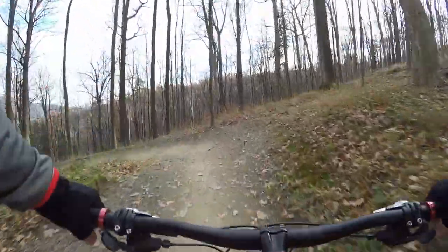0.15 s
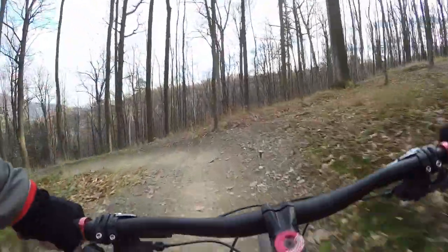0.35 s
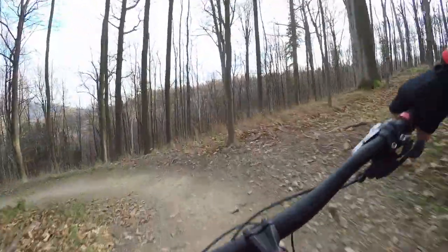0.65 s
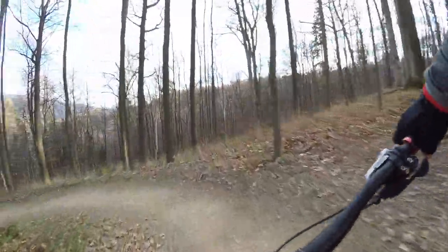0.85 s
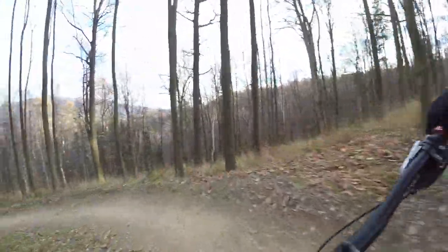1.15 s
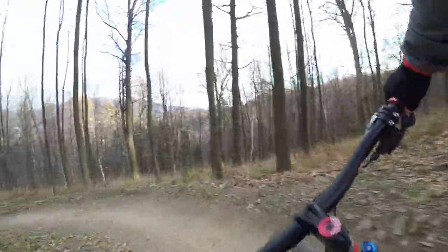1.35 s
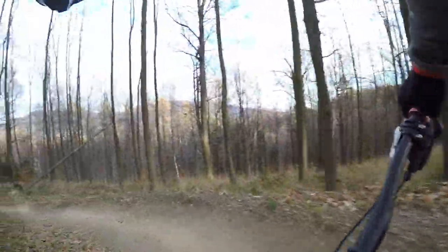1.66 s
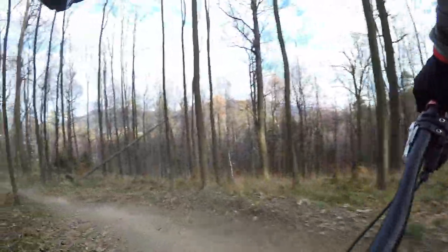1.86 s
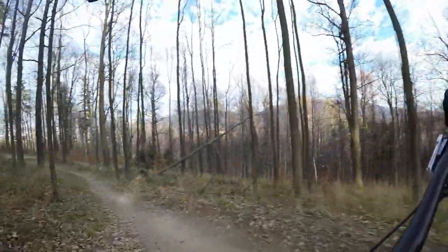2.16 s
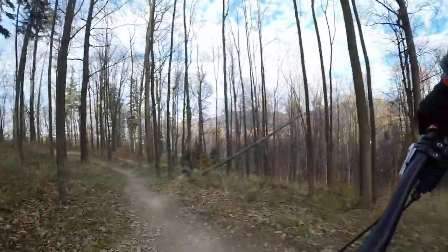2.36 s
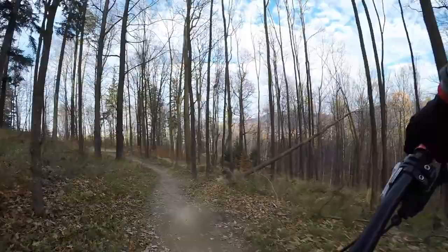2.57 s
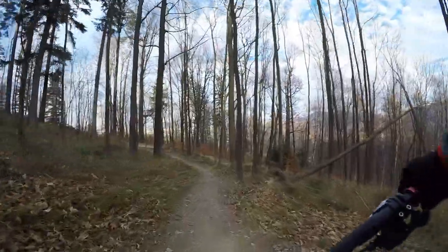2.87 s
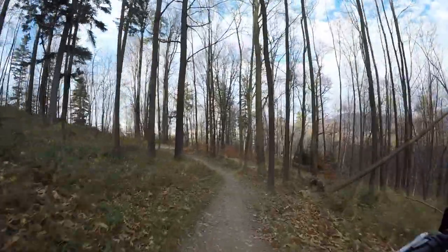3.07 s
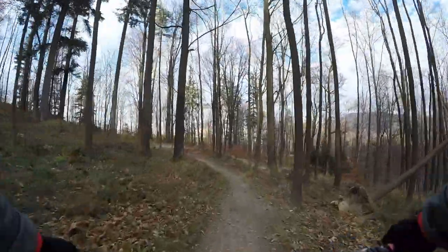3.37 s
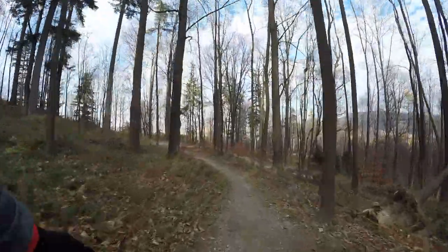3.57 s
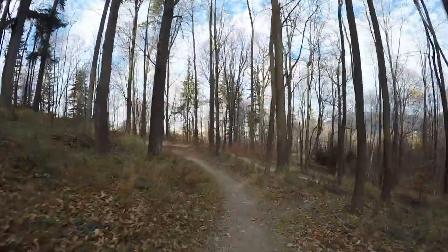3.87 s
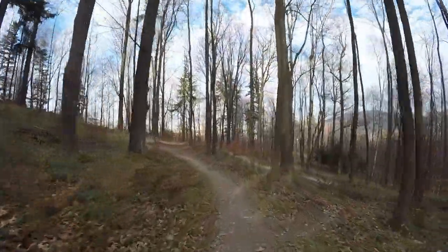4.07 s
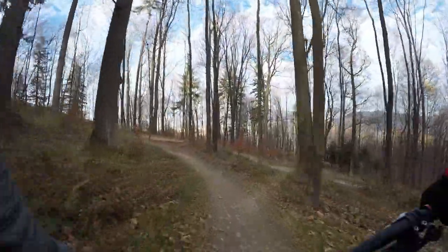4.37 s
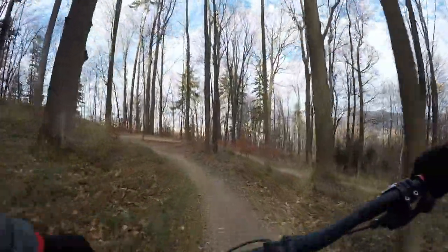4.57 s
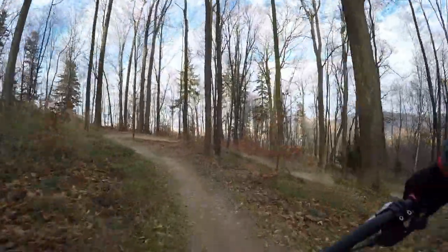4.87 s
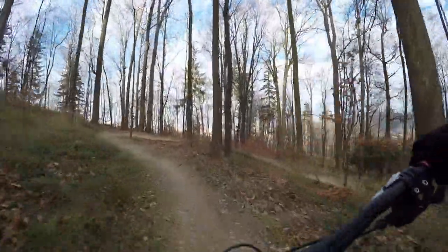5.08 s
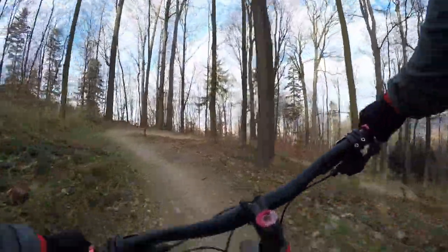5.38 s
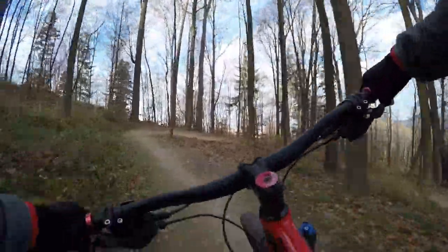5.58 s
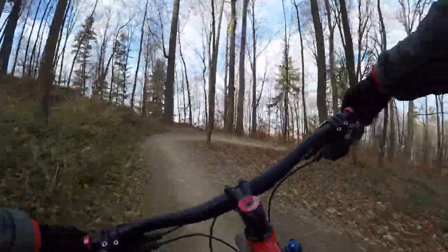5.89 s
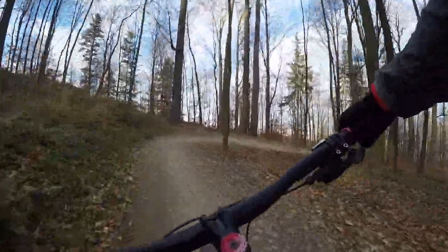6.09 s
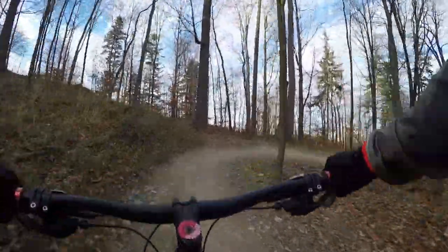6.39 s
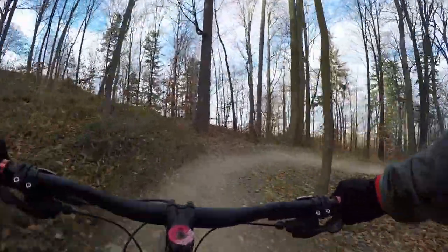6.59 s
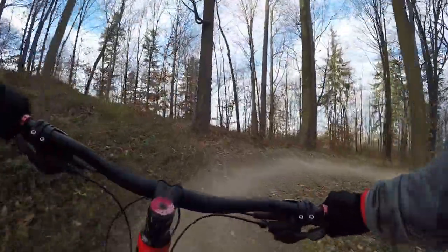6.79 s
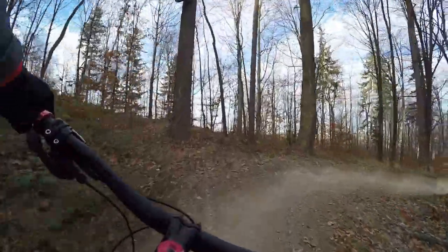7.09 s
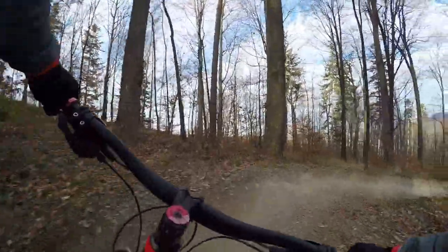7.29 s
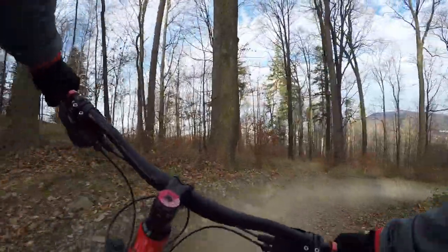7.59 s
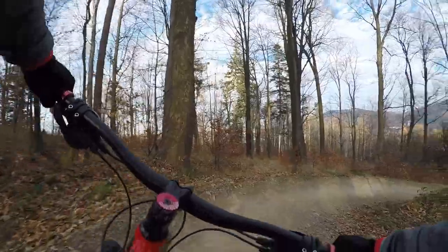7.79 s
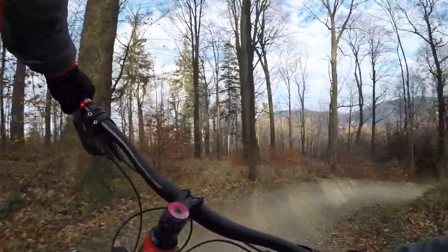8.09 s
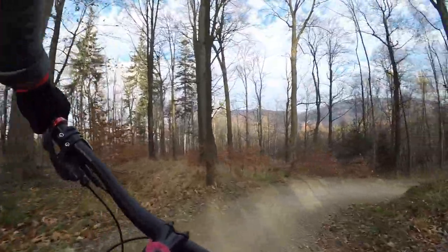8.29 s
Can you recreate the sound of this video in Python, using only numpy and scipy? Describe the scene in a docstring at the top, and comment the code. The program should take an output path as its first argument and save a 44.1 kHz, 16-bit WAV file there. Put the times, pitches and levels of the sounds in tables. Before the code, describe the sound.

Gusty wind rumbles on the microphone over a mountain bike's ticking chain, gravelly tyre noise and scattered knocks.

```python
"""Wind rumbles and buffets a microphone on a rider's chest as a mountain bike runs fast down a dirt trail.
Just below, the tyres crunch and hiss over dirt and gravel, their tread hums, and a brake disc sings faintly.
The chain ticks against metal that rings briefly, and bumps knock through the frame.
Everything is close and dry, in mono; the loudest peaks flatten at the microphone's input."""
import sys
import numpy as np
from scipy import signal
from scipy.io import wavfile
from scipy.ndimage import uniform_filter1d

SR = 44100
rng = np.random.default_rng(int(sys.argv[2]) if len(sys.argv) > 2 else 0)


def bounce(signal):
    """Save signal as a 16-bit WAV file at the path given by the first command-line argument."""
    frames = np.transpose(np.atleast_2d(signal))
    limited = np.clip(frames, -1, 1)
    pcm = np.round(limited * 32767).astype(np.int16)
    wavfile.write(sys.argv[1], SR, pcm)


N = 372644

# patches of loose gravel under the wheels: t/s, length/s, crunch level/dB
GRAVEL_PATCHES = [(1.411, 0.12, -33.5), (1.718, 0.177, -41), (2.52, 0.078, -34.5), (3.021, 0.034, -27),
                  (4.662, 0.018, -25), (4.881, 0.062, -28), (5.013, .17, -25), (5.195, 0.058, -32.5),
                  (6.151, 0.042, -30.5)]
GRAVEL_RISE_S, GRAVEL_FALL_S, GRAVEL_HISS_DB = .0074, .015, -7.5  # hiss is relative to the crunch
# modes of the chain and its gears: f/Hz, relative level/dB, t60/s
METAL_MODES = [(3600, -4, .025), (4010, -4, .05), (4570, -3, .035), (5285, -2, .04), (6235, -4, .035),
               (7300, -8, .02), (9610, -7, .04), (10400, -5, .022), (13000, -12, .02)]


def amp(db):
    return 10 ** (np.asarray(db) / 20)


def unit_rms(x):
    return x / np.sqrt(np.mean(x ** 2) + 1e-20)


def spectrum_db(points, hz):
    f, db = np.transpose(points)
    return np.interp(np.log(hz + 1), np.log(f + 1), db)


def level_curve(table, column=1):
    """Amplitude at every sample, from rows of time and dB."""
    rows = np.array(table)
    return amp(np.interp(np.arange(N) / SR, rows[:, 0], rows[:, column]))


def envelope(start, length, rise, fall):
    """A straight rise, a hold and an exponential release."""
    t = np.arange(N) / SR - start
    return np.clip(t / rise, 0, 1) * np.exp(-np.maximum(t - length, 0) / fall)


def add(mix, start, sound):
    part = mix[round(start * SR):][:len(sound)]
    part += sound[:len(part)]


def bandpass(x, low_hz, high_hz):
    return signal.sosfilt(signal.butter(3, [low_hz, high_hz], "bandpass", fs=SR, output="sos"), x)


def resonant_noise(hz, width_hz):
    """Noise ringing in one resonance, rms 1."""
    r = np.exp(-np.pi * width_hz / SR)
    feedback = [1, -2 * r * np.cos(2 * np.pi * hz / SR), r * r]
    return unit_rms(signal.lfilter([1], feedback, rng.standard_normal(N)))


def rough_noise(colour, size, patchy_db, flicker_db, stretch=lambda t: 1):
    """Patchy, flickering noise, rms 1; stretch(t) scales the frequencies of its colour."""
    hop = size // 4
    frames, bins = N // hop + 5, size // 2 + 1
    hz, t = np.fft.rfftfreq(size, 1 / SR), np.arange(frames) * hop / SR
    real, imag, patches = rng.standard_normal((frames, bins, 3)).T
    patches = unit_rms(uniform_filter1d(uniform_filter1d(patches, size=6, axis=0), size=8, axis=1))
    flicker = unit_rms(uniform_filter1d(rng.standard_normal(frames), size=3))
    gain = amp(spectrum_db(colour, hz[:, None] / stretch(t)) + patchy_db * patches + flicker_db * flicker)
    gain /= np.sqrt(uniform_filter1d((gain ** 2).mean(0), size=40))  # even out slow swells
    return unit_rms(signal.istft((real + 1j * imag) * gain, nperseg=size, noverlap=size - hop)[1][:N])


def wind():
    """Air on the microphone: a deep rumble, and buffeting that slides up in pitch as the eddies get finer."""
    # steady airflow: t/s, rumble level/dB
    airflow = [(0, -13.5), (.6, -19.5), (1.75, -13), (1.95, -17.5), (2.7, -14), (3.5, -16), (4.9, -13.5),
               (5.6, -16.5), (5.75, -20), (6.3, -17), (7.3, -20), (7.7, -21), (8.45, -18.5)]
    # gusts on the microphone: t/s, length/s, buffet level/dB, share of fine eddies/dB
    gusts = [(0, 0.07, -28, -28), (0.104, 0.22, -21.5, -20), (0.266, 0.039, -27.5, -18),
             (0.736, 0.053, -23, -13), (0.899, 0.057, -15, -21.5), (1.015, 0.032, -10.5, -27),
             (1.273, 0.025, -25, -19), (1.435, 0.16, -22.5, -6.5), (1.734, 0.061, -29, -15),
             (2.049, 0.081, -23.5, -10.5), (2.267, 0.087, -23.5, -14), (2.808, 0.15, -13.5, -8),
             (2.972, 0.022, -9, -6), (3.024, 0.047, -14, -2.5), (3.106, 0.16, -19.5, -4),
             (3.234, 0.059, -12.5, -2), (3.268, 0.064, -9, -1), (3.345, 0.32, -12.5, -3),
             (3.686, 0.091, -17.5, 0.5), (3.713, 0.15, -18, -1.5), (4.091, 0.13, -24.5, -1.5),
             (4.222, 0.088, -22.5, -1), (4.44, 0.062, -19.5, -4.5), (4.73, .09, -18.5, -8),
             (5.004, 0.059, -21, -9), (5.436, 0.16, -34, 9), (6.165, 0.13, -31, -3),
             (6.358, 0.015, -14.5, -2.5), (6.58, 0.04, -24.5, -5), (6.684, 0.086, -18, -14.5),
             (6.881, 0.054, -16, -10.5), (7.16, 0.051, -14.5, -15), (7.186, .1, -8.5, -11),
             (7.329, 0.084, -14.5, -13.5), (7.446, 0.016, -17, -10), (7.602, 0.034, -16, -15.5),
             (7.882, 0.039, -18, -15), (8.061, 0.049, -6.5, -15), (8.189, 0.019, -12, -10),
             (8.216, 0.018, -9, -6.5), (8.24, 0.073, -17, -17), (8.339, 0.028, -10, -8.5),
             (8.375, 0.041, -10.5, -9.5)]
    # colour of the rumble: f/Hz, relative level/dB
    rumble_colour = [(7.1, -26), (12, 2), (40, 2.5), (88, -7.5), (242, -30), (277, -28.5), (300, -62),
                     (390, -69), (660, -120)]
    # colour of fine eddies, before it slides: f/Hz, relative level/dB
    eddy_colour = [(60, -11), (170, -0.5), (400, -4.5), (800, -10.5), (1500, -26), (3500, -51),
                   (7000, -72.5)]
    calm_db, calm_fine_db = -14.5, -6.5  # buffeting between gusts: level re rumble, share of fine eddies
    steady_power = level_curve(airflow) ** 2
    gust_powers = np.array([(amp(db) * envelope(start, length, rise=.01, fall=.027)) ** 2
                            for start, length, db, _ in gusts])
    calm_power = steady_power * amp(calm_db) ** 2
    buffet_power = calm_power + gust_powers.sum(0)
    rumble_power = steady_power + amp(-7.5) ** 2 * gust_powers.sum(0)  # gusts also swell the rumble
    fine_db = (calm_fine_db * calm_power + np.array(gusts)[:, 3] @ gust_powers) / buffet_power
    rumble = rough_noise(rumble_colour, size=2048, patchy_db=0, flicker_db=2)
    buffet = rough_noise(eddy_colour, size=512, patchy_db=2.5, flicker_db=2.5,
                         stretch=lambda t: amp(.65 * np.interp(t, np.arange(N) / SR, fine_db)))
    return np.sqrt(rumble_power) * rumble + np.sqrt(buffet_power) * buffet


def ground_levels():
    """Amplitudes of the tyres' crunch and hiss: the dirt, with the gravel patches on top."""
    # dirt under the tyres: t/s, crunch level/dB, grit and leaf hiss level/dB
    dirt = [(0, -32.5, -43), (.22, -40, -44.5), (1.1, -40.5, -43), (1.6, -35, -39), (2.2, -36, -42.5),
            (2.5, -32, -39.5), (2.85, -44, -37.5), (3.15, -30, -36.5), (3.32, -61, -50.5),
            (3.6, -41, -55.5), (4.18, -40.5, -48.5), (4.45, -28.5, -40), (5, -35.5, -38.5),
            (5.6, -30, -35.5), (6.05, -35, -39.5), (7.05, -33.5, -40), (7.5, -36.5, -44),
            (8.45, -40, -46.5)]
    gravel_power = sum((amp(db) * envelope(start, length, GRAVEL_RISE_S, GRAVEL_FALL_S)) ** 2
                       for start, length, db in GRAVEL_PATCHES)
    crunch_level = np.sqrt(level_curve(dirt, column=1) ** 2 + gravel_power)
    hiss_level = np.sqrt(level_curve(dirt, column=2) ** 2 + amp(GRAVEL_HISS_DB) ** 2 * gravel_power)
    return crunch_level, hiss_level


def grit():
    """Single bits of grit crack under the tyres, each a few cycles with a soft start; rms 1."""
    cracks_per_s, pitches_hz = 500, np.geomspace(900, 4500, 8)
    cracks = amp(3.2 * np.minimum(rng.exponential(1, N), 4)) * (rng.random(N) < cracks_per_s / SR)
    kind = rng.integers(0, 8, N)
    cycles = np.arange(300) / SR * pitches_hz[:, None]
    grains = np.sin(2 * np.pi * cycles) * cycles * np.exp(-cycles / .84)
    return unit_rms(sum(signal.oaconvolve(cracks * (kind == k), grain)[:N]
                        for k, grain in enumerate(grains)))


def tyres():
    """Down on the trail, loose dirt crunches and hisses while the tread knobs hum in a narrow band."""
    # colour of crunching dirt: f/Hz, relative level/dB
    crunch_colour = [(300, 10.5), (700, -0.5), (1500, -1.5), (2500, -7), (4000, -18.5), (7000, -68.5)]
    # colour of grit and leaf hiss: f/Hz, relative level/dB
    hiss_colour = [(1500, 9.5), (3500, 0.5), (6500, -2.5), (8500, -4), (11000, -8.5), (15500, -9)]
    # hum of the tread: t/s, level/dB
    tread_hum = [(0, -51), (4.9, -35), (5.2, -28.5), (6, -33.5), (6.3, -36), (7.6, -43), (7.85, -27),
                 (8.05, -33), (8.45, -22)]
    crunch_level, hiss_level = ground_levels()
    crunch = rough_noise(crunch_colour, size=256, patchy_db=4, flicker_db=3.5)
    hiss = rough_noise(hiss_colour, size=256, patchy_db=1.5, flicker_db=2)
    crunch += amp(-9.5) * grit()
    hum = level_curve(tread_hum) * resonant_noise(hz=249.3, width_hz=5.3)
    return crunch_level * crunch + hiss_level * hiss + hum


def brake():
    """The disc sings faintly in two resonances while the pads brush it."""
    # pads on the disc: t/s, level of the stronger resonance/dB
    pad_rub = [(0, -66), (4.7, -64), (5.5, -61), (7.3, -58), (7.8, -60), (8.15, -55.5), (8.45, -58)]
    disc = resonant_noise(hz=4074, width_hz=72) + amp(-7) * resonant_noise(hz=3660, width_hz=51)
    return level_curve(pad_rub) * disc


def link_tick(centre_hz, treble_db, white):
    """A link strikes metal: a sharp crack and randomly weighted modes, favoured near centre_hz; peak 1."""
    t = np.arange(len(white)) / SR
    hz, db, t60 = np.transpose(METAL_MODES)[..., None]
    near_db = -np.minimum(30 * abs(np.log2(hz / centre_hz)), 9)
    weight_db = db + .7 * white[:len(hz), None] + np.where(hz > 8000, treble_db + 10, near_db)
    detune = 1 + .005 * white[-len(hz):, None]  # each link is a little different
    ring = (amp(weight_db - 60 * t / t60) * np.sin(2 * np.pi * hz * detune * t)).sum(0)
    crack = bandpass(white, 3400, 7000) + amp(treble_db + 10.5) * bandpass(white, 9000, 12500)
    crack_decay = amp(6 - 60 * t / .008) + amp(-5 - 60 * t / .06)
    sound = ring + crack_decay * crack
    return sound / abs(sound).max()


def chain():
    """The chain ticks clearly on metal, over a patter of small ticks that grows on rough ground."""
    # clear strikes of the chain: t/s, peak level/dB, favoured ring f/Hz
    strikes = [(0.0344, -22.5, 5300), (0.1224, -23.5, 4010), (0.194, -24, 4570), (0.264, -27, 4550),
               (0.4812, -24.5, 5280), (0.5533, -25.5, 5100), (0.8535, -26, 4530), (0.871, -24, 4540),
               (0.9323, -26, 3950), (1.0204, -18.5, 4560), (1.2065, -22, 3620), (1.264, -21, 4550),
               (1.3324, -16.5, 5280), (1.4215, -13.5, 6400), (1.4486, -9, 3990), (1.4804, -12.5, 6220),
               (1.5196, -12.5, 4000), (1.5462, -12, 3500), (1.6277, -14, 6220), (1.714, -26, 3600),
               (1.75, -20.5, 3640), (1.8116, -17, 4570), (1.8324, -17, 4570), (1.8512, -16, 5800),
               (1.8727, -21, 4530), (2.026, -15, 5610), (2.0712, -14.5, 4560), (2.1776, -20, 4560),
               (2.2528, -22.5, 5300), (2.3047, -19, 5300), (2.383, -20.5, 3300), (2.5445, -9.5, 6240),
               (2.597, -18, 5260), (2.663, -18.5, 6030), (2.7703, -18, 6270), (2.83, -15, 6300),
               (2.89, -17, 5290), (2.9442, -24, 4360), (2.9804, -18.5, 3740), (3.0403, -12.5, 6230),
               (3.149, -22, 3460), (3.1885, -18.5, 3300), (3.3734, -35, 3530), (3.468, -33, 3980),
               (3.518, -30, 3640), (3.6147, -29, 4010), (3.6603, -31, 4010), (3.705, -29, 4590),
               (3.7614, -29, 3680), (3.8102, -29.5, 3540), (3.8626, -26, 3760), (3.894, -27, 4550),
               (4.002, -27, 4540), (4.155, -21, 4650), (4.2358, -21.5, 4550), (4.278, -14.5, 4570),
               (4.4025, -23, 4570), (4.4617, -21, 4040), (4.676, -27, 5300), (4.8329, -22, 4000),
               (4.8893, -25, 4600), (4.9127, -13, 4010), (5.0442, -5, 4010), (5.0704, -12, 3470),
               (5.1047, -14.5, 4000), (5.1324, -12, 4010), (5.1524, -13, 4090), (5.2255, -13, 6240),
               (5.248, -18, 3420), (5.3413, -23, 5270), (5.362, -14.5, 6290), (5.4257, -15, 5290),
               (5.478, -10.5, 5300), (5.5348, -13.5, 3660), (5.6805, -24, 5260), (5.7564, -17, 5280),
               (5.8178, -20.5, 3640), (5.861, -18, 5260), (6.0057, -25, 3600), (6.052, -22, 3570),
               (6.4796, -25, 5300), (6.553, -26, 4030), (6.6638, -24, 5310), (6.7186, -20, 5290),
               (6.93, -21, 5250), (7.0808, -23, 3990), (7.1324, -22, 4520), (7.2075, -24, 3460),
               (7.2767, -18, 5260), (7.3247, -24, 5280), (7.375, -24.5, 5230), (7.459, -28, 5230),
               (7.4954, -28, 5280), (7.5275, -25.5, 4270), (7.551, -33, 4580), (7.569, -24.5, 4610),
               (7.746, -25, 5270), (7.7866, -33, 4030), (7.8427, -25.5, 4030), (7.9244, -23.5, 4560),
               (7.974, -25, 5290), (8.043, -23.5, 5320), (8.1045, -28, 5190), (8.171, -26, 4570),
               (8.4193, -26, 3590)]
    # brightness of the strikes above 8 kHz: t/s, relative level/dB
    brightness = [(0, -17), (1.3, -28.5), (2.1, -13.5), (4.4, -15.5), (5.1, -13), (7.1, -10.5), (8.45, -15)]
    treble_spread_db, patter_per_s, gravel_extra_per_s = 6, 55, 220
    out = np.zeros(N)
    for (start, db, hz), white in zip(strikes, rng.standard_normal((len(strikes), 3000))):
        treble_db = np.interp(start, *np.transpose(brightness)) + treble_spread_db * white[1500]
        add(out, start, amp(db) * link_tick(hz, treble_db, white))
    _, hiss_level = ground_levels()
    patter = hiss_level * amp(4 + 3.3 * np.minimum(rng.exponential(1, N), 3))
    on_gravel = sum(envelope(start, length, GRAVEL_RISE_S, GRAVEL_FALL_S)
                    for start, length, _ in GRAVEL_PATCHES)
    patter *= rng.random(N) < (patter_per_s + gravel_extra_per_s * on_gravel) / SR
    kind = rng.integers(0, 14, N)
    for k, white in enumerate(rng.standard_normal((14, 3000))):
        tick = link_tick(centre_hz=METAL_MODES[k % 5][0], treble_db=-14.5, white=white)
        out += signal.oaconvolve(patter * (kind == k), tick)[:N]
    return out


def frame_knocks():
    """Each bump is a dry, wide crack with a short hollow ring of the struck part, over a dull thud."""
    # bumps through the frame: t/s, peak level/dB, ring f/Hz, thud re ring/dB, crack re ring/dB
    bumps = [(1.008, -14.5, 2620, -10, 6), (1.396, -17.5, 1370, -6, 1), (1.4623, -12, 1690, 2, 3),
             (1.5534, -12.5, 1000, 5, 1), (1.579, -12, 1340, 6, -1), (2.3645, -16, 1510, -6, -4),
             (2.814, -19, 1270, -6, 3), (2.8537, 3, 1090, 9, 5.5), (3.215, -11.5, 2040, -12, 4),
             (3.2949, -11, 1010, -6, 1), (4.1717, -17.5, 1290, -12, 7), (4.882, -6, 1266, -12, 3),
             (5.023, -11, 1150, -8, 6), (6.317, -11.5, 1360, -14, 4), (7.014, -14, 1130, 0, -7)]
    thud_hz, thud_t60_s, ring_t60_s = 600, .025, .04
    out, t = np.zeros(N), np.arange(3000) / SR
    thud = amp(-60 * t / thud_t60_s) * np.sin(2 * np.pi * thud_hz * t)
    crack_decay = amp(-60 * t / .016) + amp(-17 - 60 * t / .07)
    for start, db, hz, thud_db, crack_db in bumps:
        crack = unit_rms(bandpass(rng.standard_normal(len(t)), .4 * hz, 2.6 * hz))
        ring = amp(-60 * t / ring_t60_s) * np.sin(2 * np.pi * hz * t)
        sound = amp(thud_db) * thud + ring + amp(crack_db) * crack_decay * crack
        add(out, start, amp(db) * sound / abs(sound).max())
    return out


def scene():
    """Everything arrives dry and close at one chest microphone."""
    return (wind() + tyres() + brake() + chain() + frame_knocks())[None]


def record(dry):
    """The loudest peaks flatten against the ceiling of the input, then the top of the treble is cut."""
    ceiling, cutoff_hz = .97, 15450
    rounded = dry / (1 + (dry / ceiling) ** 4) ** .25
    lowpass = signal.firwin(255, cutoff_hz, window=("kaiser", 7), fs=SR)
    return signal.oaconvolve(rounded, lowpass[None], "same")


dry = scene()
out = record(dry)
bounce(out)
```